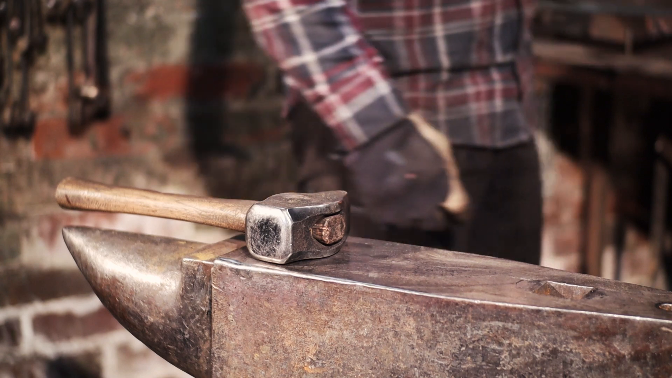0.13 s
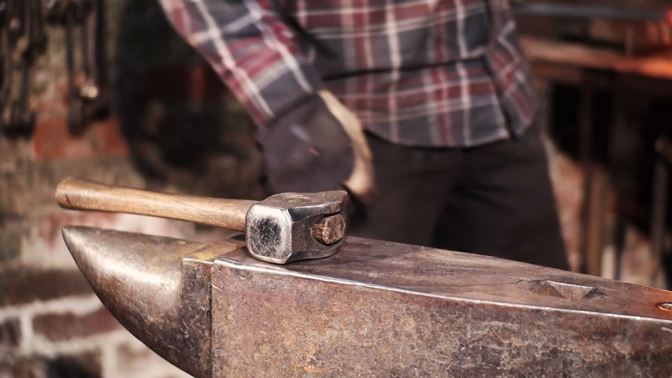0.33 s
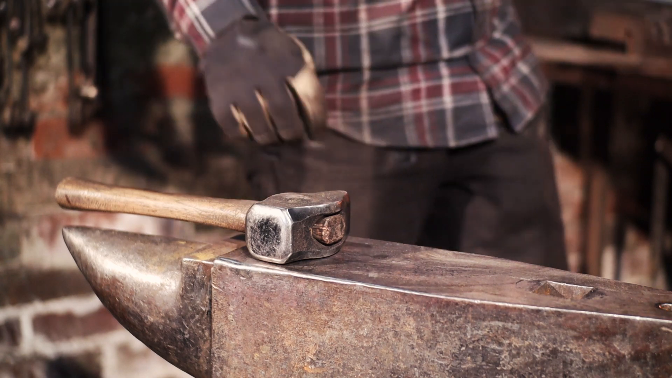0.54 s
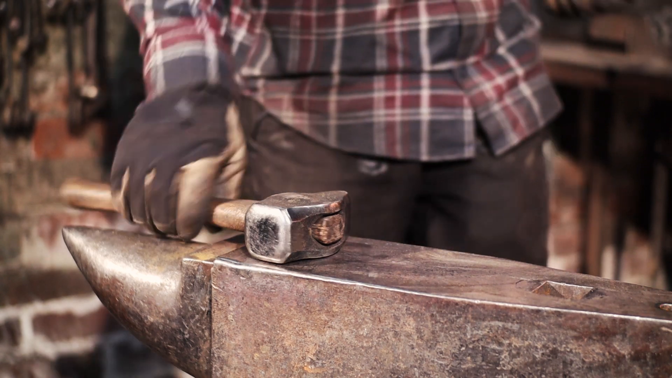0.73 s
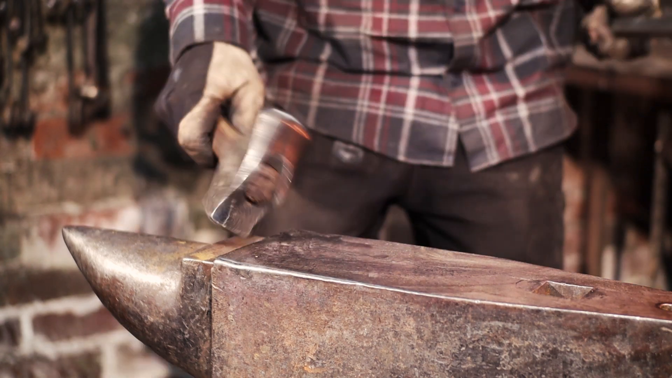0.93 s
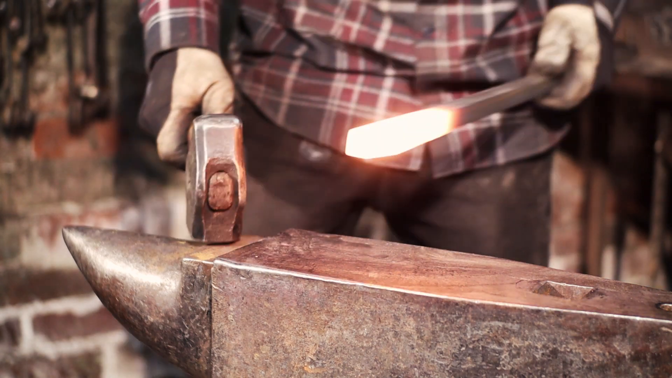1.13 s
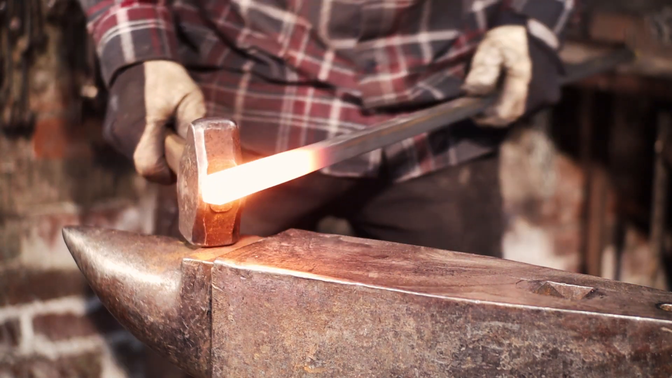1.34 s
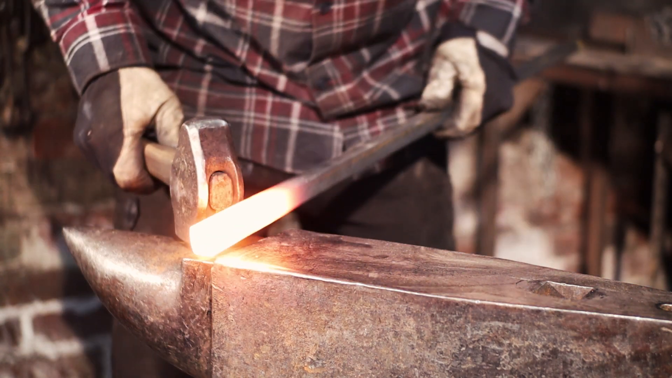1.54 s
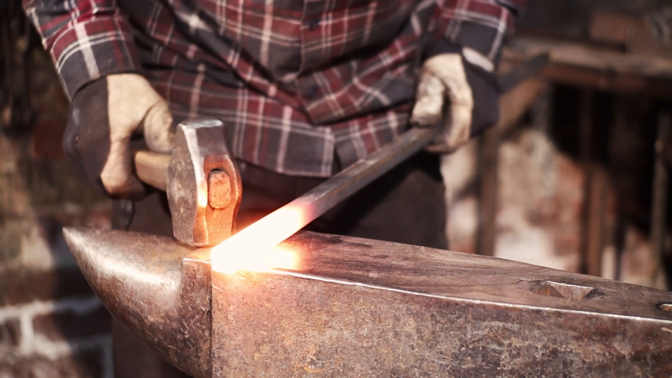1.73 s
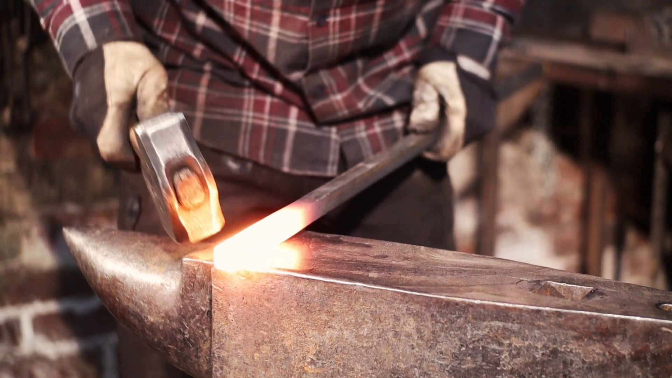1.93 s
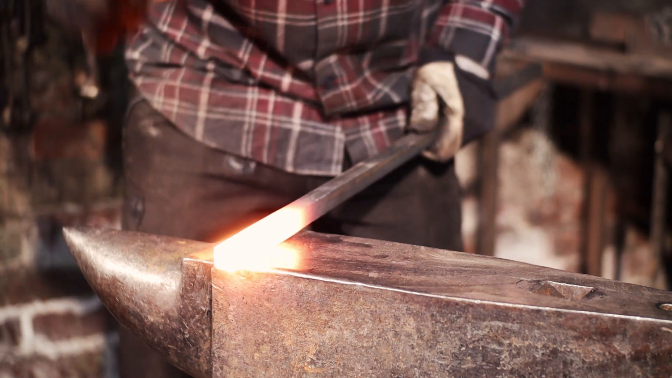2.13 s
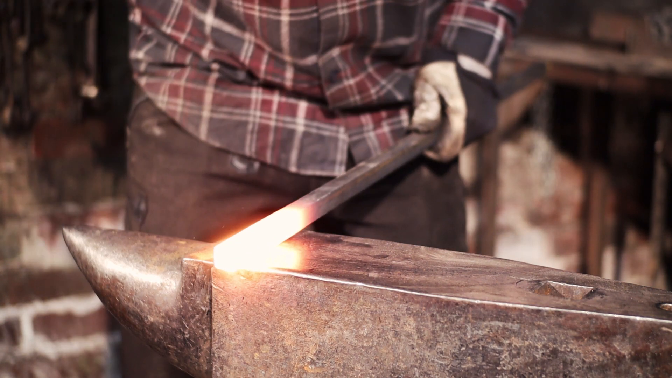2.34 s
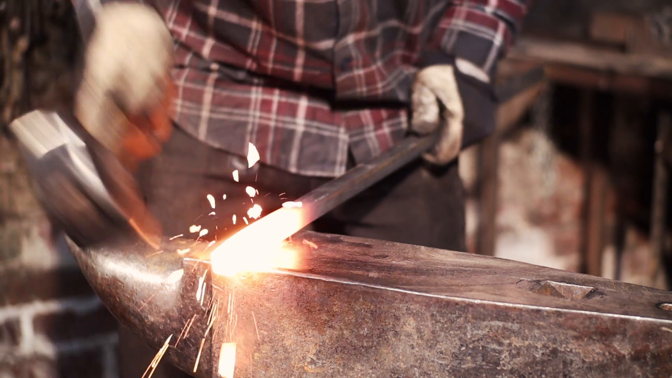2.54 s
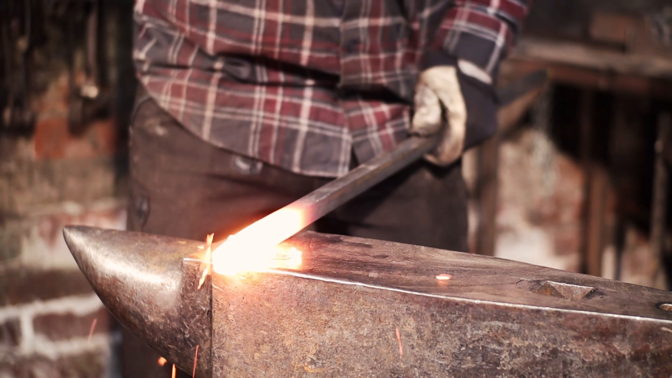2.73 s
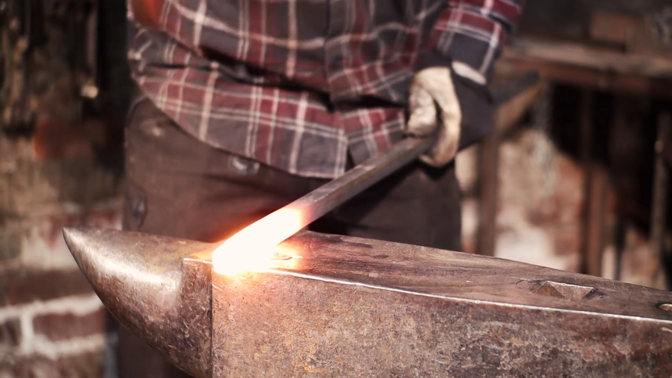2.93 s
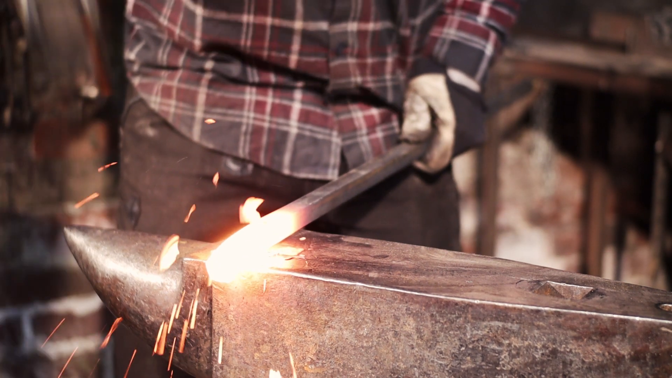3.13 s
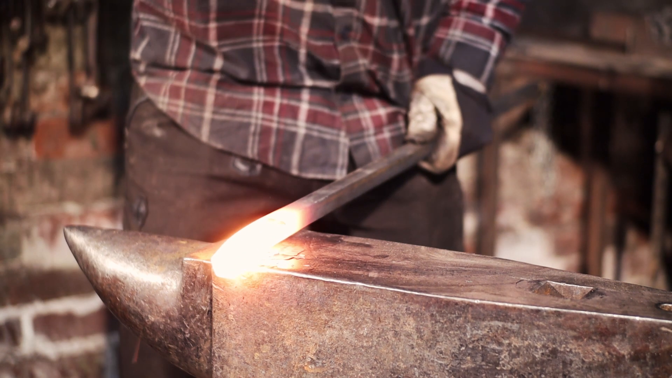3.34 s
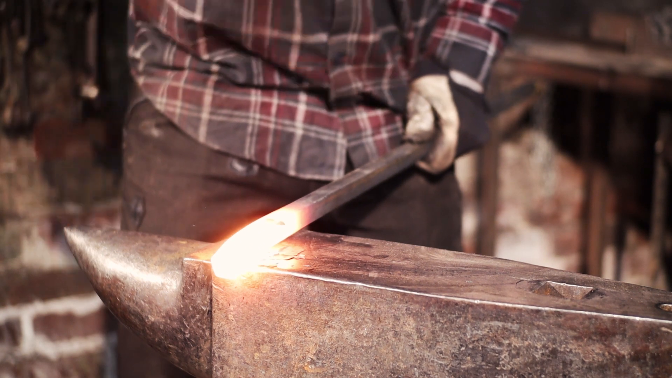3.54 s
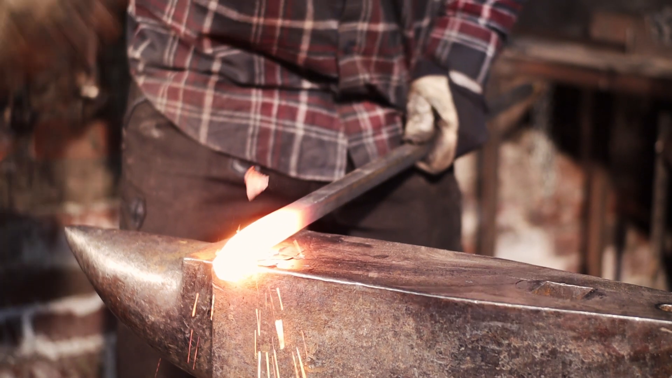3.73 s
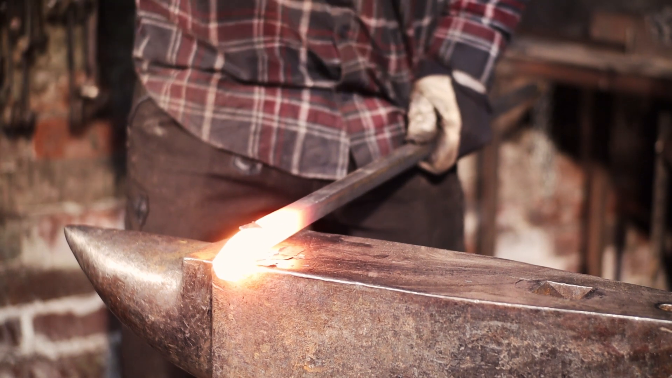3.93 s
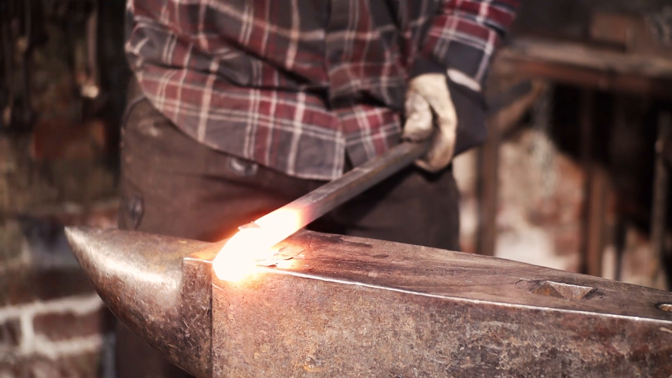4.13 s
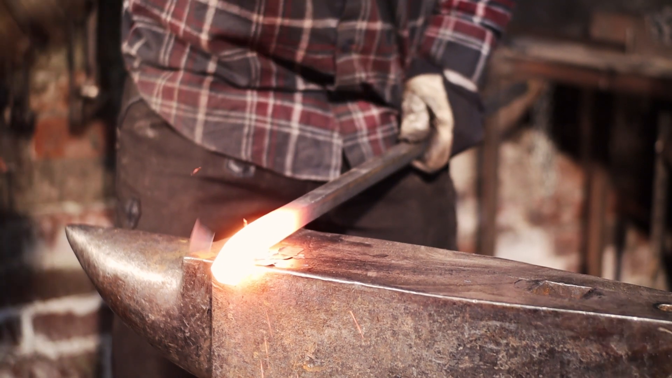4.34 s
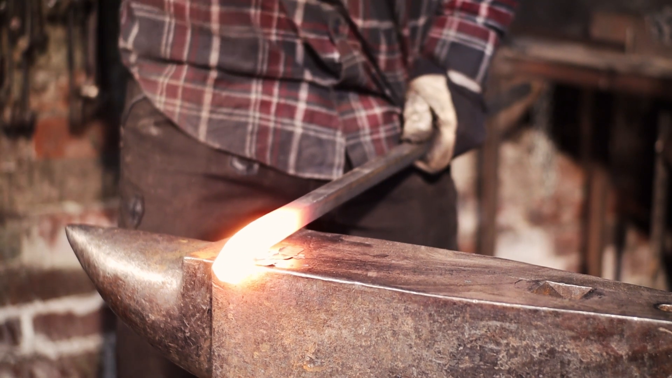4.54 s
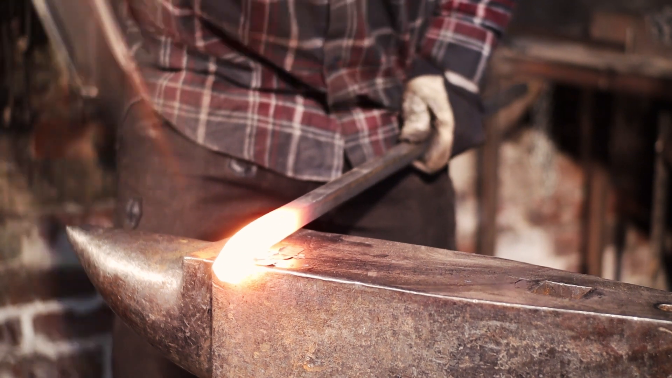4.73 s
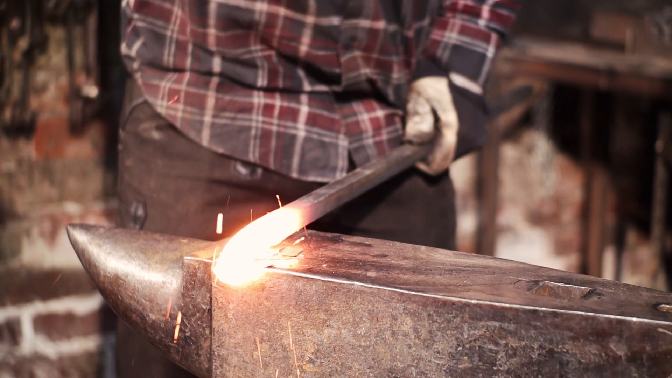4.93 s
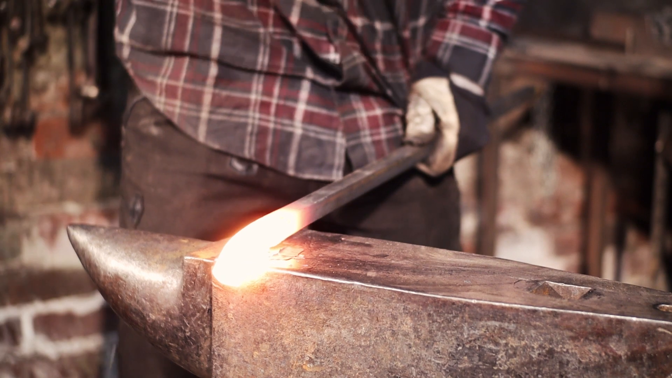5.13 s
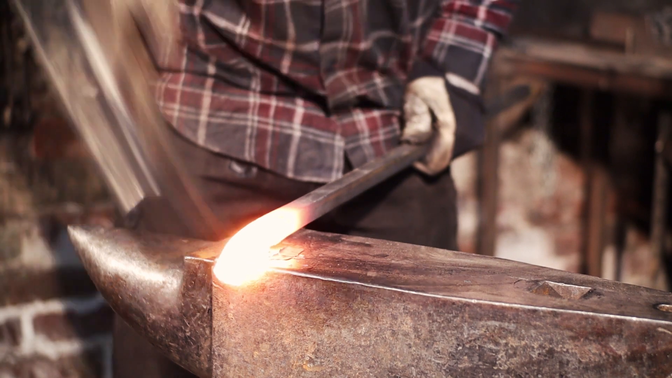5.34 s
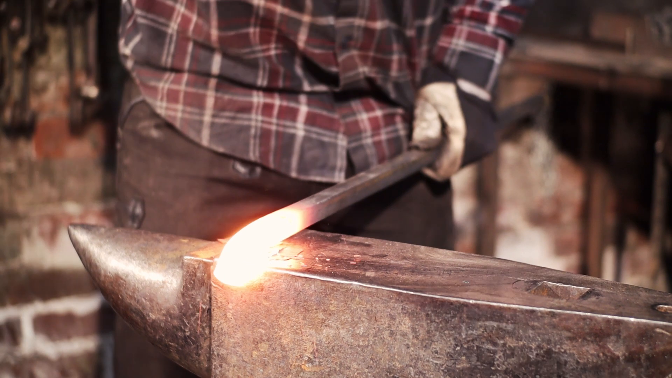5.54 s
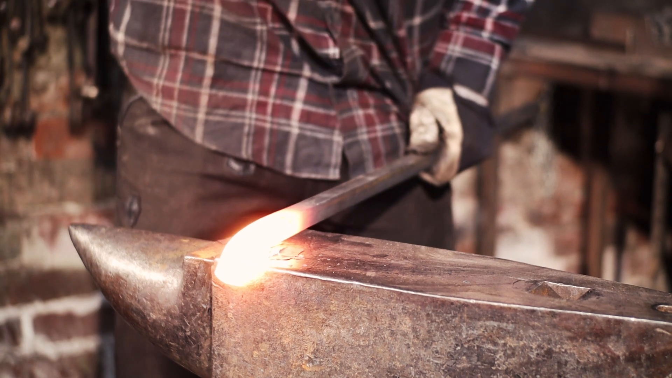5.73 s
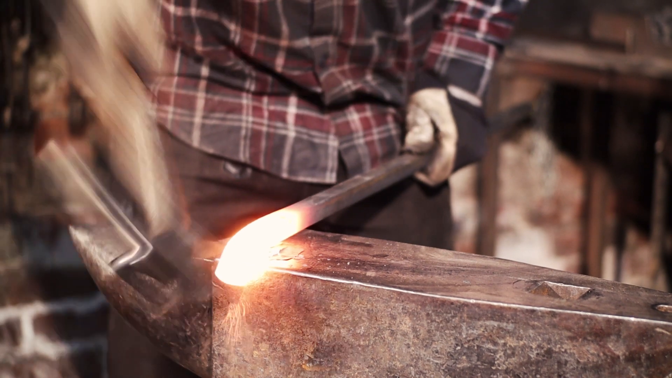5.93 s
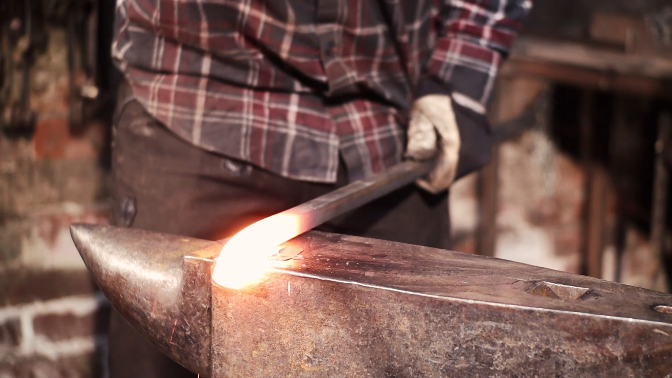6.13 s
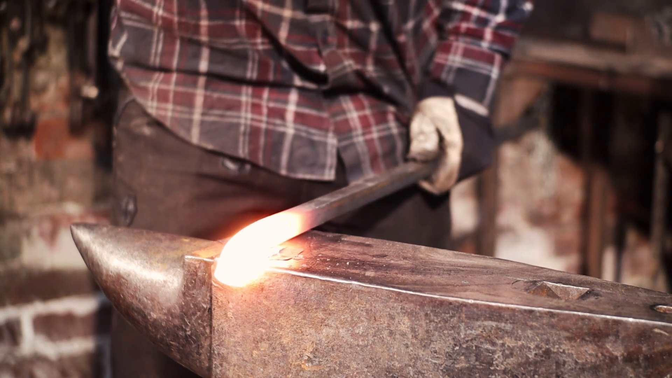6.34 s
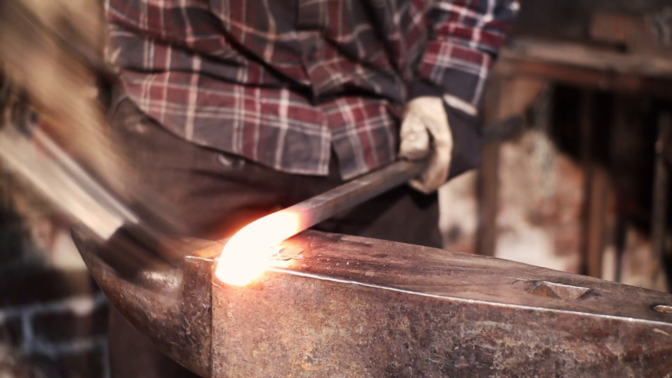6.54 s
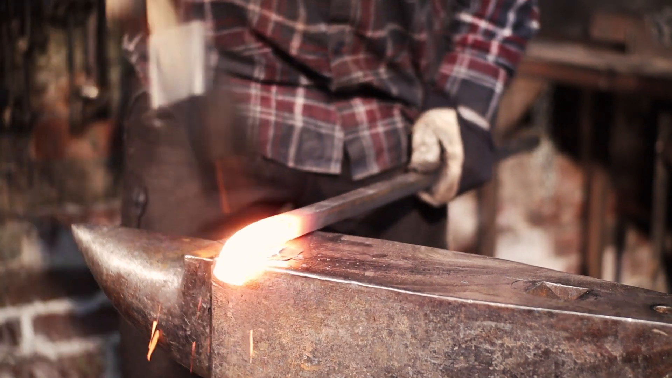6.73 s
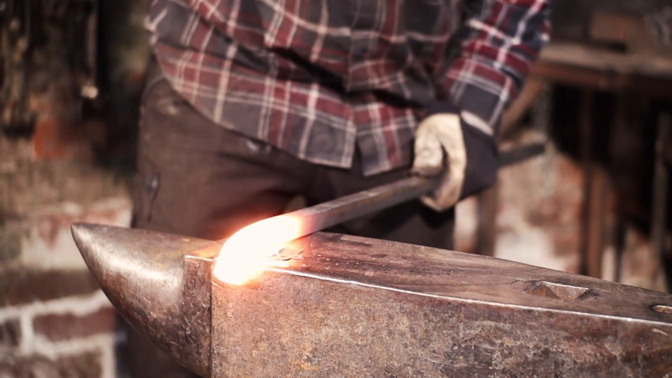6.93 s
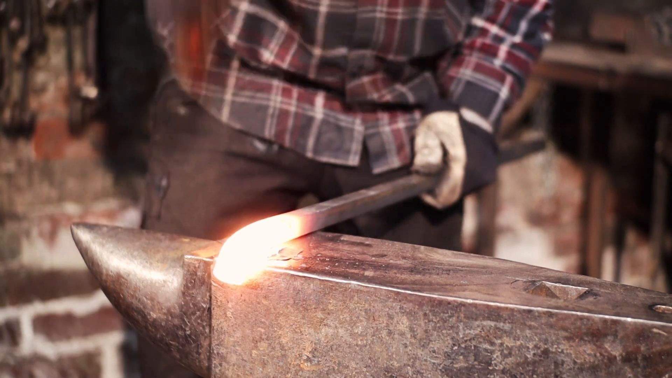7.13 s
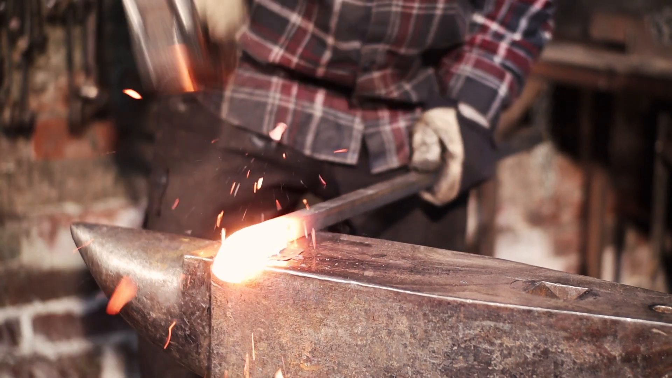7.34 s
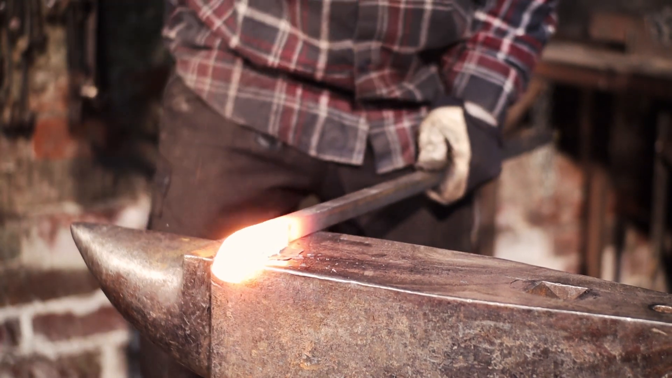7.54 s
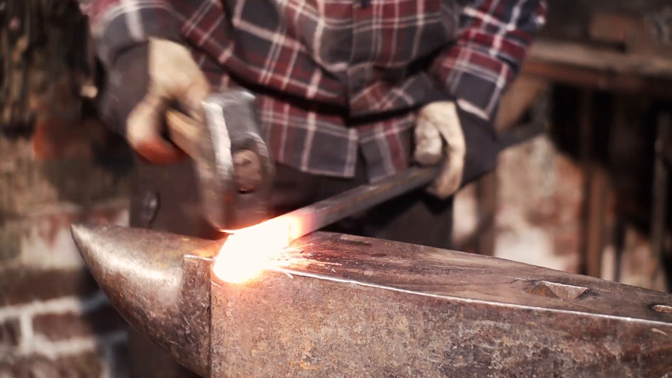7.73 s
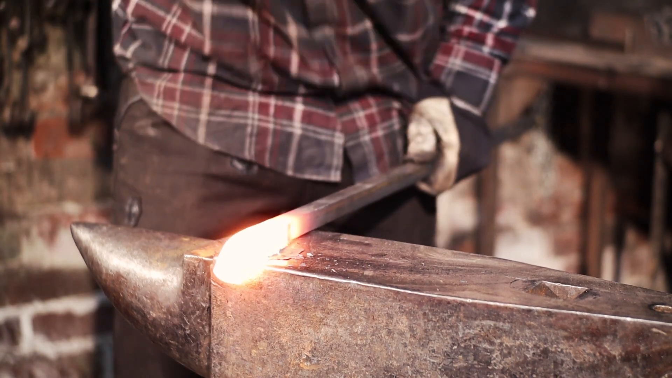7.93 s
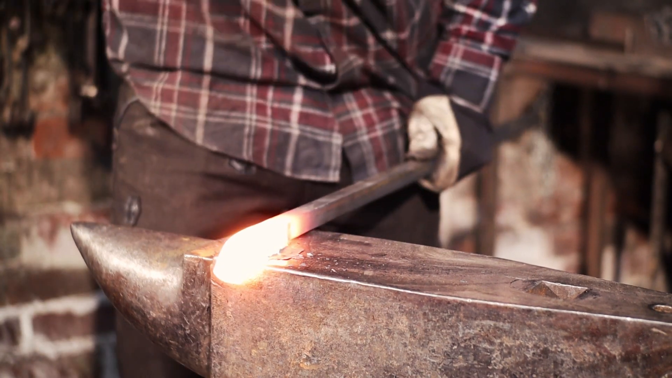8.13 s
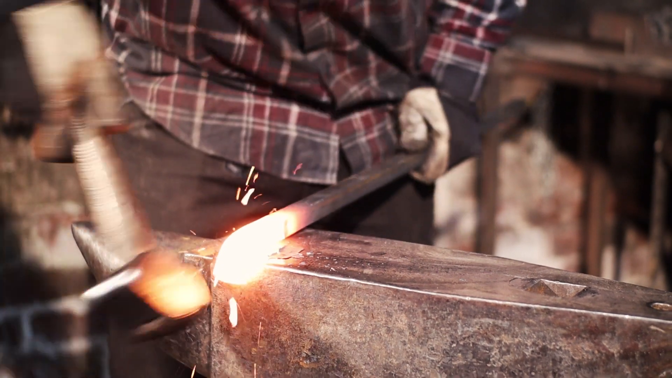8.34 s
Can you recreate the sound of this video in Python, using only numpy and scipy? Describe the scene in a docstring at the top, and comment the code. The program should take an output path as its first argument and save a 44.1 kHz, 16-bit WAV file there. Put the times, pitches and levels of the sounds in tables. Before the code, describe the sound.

In a brick forge, a smith strikes a hot steel bar ten times, each blow a hard cracking clang with a short ring and low boom.

```python
"""A hearth rushes and hums faintly; iron tools clank down nearby, the hammer knocks lightly on the anvil, and a
bar slides into place. A smith in a brick forge then gives the glowing bar ten hammer blows on an anvil. Each
blow is a half-sine-swelled thud plus a noise burst of cracking scale and a dense clang. Decaying sines make the
rocking and ringing anvil; low modes swell into a boom. Noise makes the sliding, falling flakes and popping
sparks; decaying noise makes the room's answer."""
import sys
import numpy as np
from scipy import signal
from scipy.fft import rfft, irfft
from scipy.io import wavfile

SR = 44100
rng = np.random.default_rng(int(sys.argv[2]) if len(sys.argv) > 2 else 0)


def int16_out(signal):
    """Quantize to a 16-bit WAV file."""
    q = np.round(np.clip(np.atleast_2d(signal).T, -1, 1) * 32767)
    wavfile.write(sys.argv[1], SR, q.astype(np.int16))


N = 369558
AGE = np.arange(SR) / SR  # seconds since an event's onset


def from_db(db):
    """Decibels to gain."""
    return 10 ** (np.asarray(db) / 20)


def add(track, start_s, sound):
    """Mix a sound in at a time, cutting it at the track's end."""
    at = int(start_s * SR)
    track[at:at + len(sound)] += sound[:N - at]


def highpass(x, corner_hz, order=2):
    """Butterworth high-pass."""
    sos = signal.butter(order, corner_hz, "high", fs=SR, output="sos")
    return signal.sosfilt(sos, x + 1e-18)  # tiny offset avoids slow denormals


def colour_gain(spectrum, size):
    """FFT-bin gains, interpolated over log frequency, falling 12 dB/octave below the table."""
    hz, db = np.transpose(spectrum)
    bin_hz = np.maximum(np.fft.rfftfreq(size, 1 / SR), 1)
    gain = from_db(np.interp(np.log(bin_hz), np.log(hz), db))
    return gain * np.minimum(bin_hz / hz[0], 1) ** 2


def noise(spectrum, size):
    """Noise of rms 1 with a given colour."""
    white = rng.standard_normal(size)
    x = irfft(rfft(white) * colour_gain(spectrum, size), size)
    return x / x.std()


def arch(length_s):
    """Half-sine swell, zero after its length."""
    return np.sin(np.pi * np.clip(AGE / length_s, 0, 1))


def wander(rate_hz):
    """Random curve: straight lines between knots of spread 1."""
    knots = rng.standard_normal(2000)
    return np.interp(AGE * rate_hz, np.arange(len(knots)), knots)


def ring(modes):
    """Struck modes: decaying sines."""
    return sum(from_db(db - 60 * AGE / t60_s) * np.sin(2 * np.pi * hz * AGE) for hz, db, t60_s in modes)


def wavering_ring(modes, mingle_s=0.09, rate_hz=28):
    """Struck modes whose level and phase waver once reflections mingle with them."""
    depth = 0.4 * (1 - np.exp(-AGE / mingle_s))
    out = 0
    for hz, db, t60_s in modes:
        phase = 2 * np.pi * hz * AGE + depth * wander(rate_hz)
        level = from_db(db - 60 * AGE / t60_s) * (1 + depth * wander(rate_hz))
        out = out + level * np.sin(phase)
    return out


def wash(table):
    """Modes too dense to tell apart: third-octave noise bands, each with its own energy and decay."""
    hz, db, t60_s = np.transpose(table)
    edges_hz = np.geomspace(45, 18000, 27)
    age = AGE[:int(1.5 * t60_s.max() * SR)]
    white = rng.standard_normal((2, len(AGE)))[:, :len(age)]
    out = np.zeros(len(AGE))
    for k, (low, high) in enumerate(zip(edges_hz, edges_hz[1:])):
        centre = np.sqrt(low * high)
        level_db = np.interp(np.log(centre), np.log(hz), db)
        decay_s = np.interp(np.log(centre), np.log(hz), t60_s)
        skirt = min(centre / hz[0], hz[-1] / centre, 1) ** 2
        sos = signal.butter(2, [low, high], "band", fs=SR, output="sos")
        # neighbouring bands take different noise
        band = signal.sosfilt(sos, white[k % 2] * from_db(-60 * age / decay_s))
        # at 0 dB a band holds the energy a unit impulse has there
        unit_energy = np.sqrt(2 * (high - low) / SR / np.sum(band ** 2))
        out[:len(age)] += band * from_db(level_db) * skirt * unit_energy
    return out


# air rush colour: (frequency [Hz], relative level [dB])
AIR = [(50, -9.5), (62, -15.5), (100, -3.5), (130, -19), (230, -4), (350, -15.5), (750, -15), (950, -19),
       (1450, -18), (2100, -31), (3300, -29.5), (4200, -35), (5300, -33), (7500, -47), (11000, -54),
       (16000, -54.5)]
AIR_RMS_DB = -48.5
# blower hum: (frequency [Hz], rms level [dB])
HUM = [(102, -63), (301.5, -61.5), (791, -65.5)]


def hearth():
    """Steady turbulent rush of hearth and blower: coloured noise plus the blower's sine hum."""
    t = np.arange(N) / SR
    hum = sum(np.sqrt(2) * from_db(db) * np.sin(2 * np.pi * hz * t) for hz, db in HUM)
    return from_db(AIR_RMS_DB) * noise(AIR, N) + hum


# knocks: tools set down (to 0.19 s), then the hammer touching the anvil: (time [s], click gain [dB], ring gain
# [dB])
KNOCKS = [(0.1752, -3.5, -40), (0.1787, -5, 3), (0.1814, 1, -30), (0.1879, -6.5, -21), (0.9, -25, -35),
          (0.9688, -25, -37), (0.987, -26.5, -42), (1.2203, -16.5, -25.5), (1.288, -15.5, -23.5),
          (1.3227, -19.5, -28), (1.346, -28, -39)]
# hollow body of a knock: (frequency [Hz], level [dB], t60 [s])
KNOCK_BODY = [(100, 16, 0.37), (149, 21.5, 0.27), (288, 23.5, 0.25), (416, 26, 0.13), (560, 21.5, 0.068),
              (785, 21, 0.024), (1330, 18.5, 0.16), (2210, 5, 0.12)]
# dense modes of a click: (frequency [Hz], level [dB], t60 [s])
KNOCK_CLICK = [(800, -11, 0.084), (1600, 6.5, 0.032), (2730, 15, 0.06), (3600, 11, 0.012),
               (4640, 14, 0.087), (6450, -16, 0.25), (8800, -10, 0.086), (10900, -33, .04),
               (15000, -32, .04)]
# ringing modes of the knocked iron: (frequency [Hz], level [dB], t60 [s])
KNOCK_RING = [(2807, -19, .11), (2807, -35, .65), (2898, -20, .11), (2898, -32.5, .52), (1556, -36, .35),
              (2562, -43, .8), (3655, -41, .5), (4194, -47, .55), (4576, -36, .25), (5373, -39, .3),
              (8861, -52, .35)]
# hammer edge tinking as it leaves the anvil: (frequency [Hz], level [dB], t60 [s])
TINK = [(12270, -65, 0.48)]
TINK_S = 0.97
# body against click at a 0 dB click; dB gained per dB softer
HOLLOW_DB, HOLLOW_GAIN = -2, 0.23
# body's low corner at a 0 dB click; dB softer per octave down
HOLLOW_HZ, HOLLOW_DB_PER_OCTAVE = 300, 9


def knocks():
    """Iron knocks of tools and hammer: click, hollow body, ring; gentler touches are duller, deeper and last
    longer."""
    touches, rings = np.zeros(N), np.zeros(N)
    for s, click_db, ring_db in KNOCKS:
        body_db = HOLLOW_DB - HOLLOW_GAIN * click_db
        lowest_hz = HOLLOW_HZ * 2 ** (click_db / HOLLOW_DB_PER_OCTAVE)
        body = highpass(wash(KNOCK_BODY), lowest_hz)
        knock = wash(KNOCK_CLICK) + from_db(body_db) * body
        add(touches, s, from_db(click_db) * knock)
        add(rings, s, from_db(ring_db) * wavering_ring(KNOCK_RING))
    add(rings, TINK_S, wavering_ring(TINK))
    return touches, rings


# glove, bar and sleeve sliding: (start [s], end [s], level before grit and swell [dB])
SLIDES = [(0.731, .88, -57.5), (1.548, 1.70, -45.5), (6.628, 6.70, -49), (7.76, 7.80, -53.5)]
# slide and flake colour: (frequency [Hz], relative level [dB])
SLIDE = [(300, 4), (900, 4.5), (2000, -3), (5000, -1.5), (8000, -15), (15000, -20.5)]
# larger scale flakes landing: (time [s], onset level [dB])
FLAKES = [(3.515, -47), (4.661, -47.5), (5.364, -45), (5.405, -47), (6.515, -45.5)]


def handling(grit_db=1.5, grit_hz=440, flake_t60_s=0.01545):
    """Friction as noise of randomly varying level; falling scale as short decaying noise ticks."""
    out = np.zeros(N)
    for start_s, end_s, db in SLIDES:
        grit = from_db(grit_db * wander(grit_hz))
        swell = np.sqrt(arch(max(end_s - start_s, 0.01)))
        add(out, start_s, from_db(db) * noise(SLIDE, len(AGE)) * grit * swell)
    for s, db in FLAKES:
        add(out, s, from_db(db - 60 * AGE / flake_t60_s) * noise(SLIDE, len(AGE)))
    return out


# hammer blows, shared by all blow layers: (time [s], thud [dB], crack [dB], clang [dB],
# treble tilt [dB per octave over the top two], body ring [dB], face ring [dB])
BLOWS = [ (2.5962, -12.5, -15.5, 6.5, 2, -16, -0.5), (3.1287, -16.5, -15.5, 4.5, 1.5, -17, -6),
         (3.7296, -3.5, -5.5, 3, -1, -23, -8), (4.3222, -4, -8, 2.5, 1, -18, -10),
         (4.8946, -3, -6, 2.5, -1.5, -6.5, -10), (5.4796, -1, -1, 1.5, 1, -21.5, -15),
         (6.0732, 1, -10, 1.5, 3.5, -2, -4.5), (6.6922, -0.5, -9.5, 5.5, -17, -10, -9),
         (7.3286, -14.5, -3.5, 7.5, 3, -26, 6), (7.8384, -4.5, -5, 10, -7, -17, 1)]
# anvil rocking on its stand: (frequency [Hz], level [dB], t60 [s])
ROCKING = [(192.6, -23.5, 0.25), (278.6, -17, 0.15), (394, -13, 0.048), (474.5, -13.5, 0.038),
           (686.5, -13.5, 0.071)]
# shattering scale cushions the blow: rocking at a 0 dB crack; dB lost per dB of crack
ROCK_DB, ROCK_LOSS = -5, 0.4
# the worked bar hardens: first and final thud pitch, time constant
SOFT_HZ, HARD_HZ, HARDEN_S = 380, 672, 1.31


def thuds(best_ratio=0.7, falloff_db=18.0, lowest_hz=170):
    """The head stops in the soft bar and the anvil rocks; pitch rises with time as the bar hardens."""
    out = np.zeros(N)
    hz, db, t60_s = np.transpose(ROCKING)
    for s, thud_db, crack_db, *_ in BLOWS:
        rock_db = ROCK_DB - ROCK_LOSS * crack_db
        softness = np.exp((BLOWS[0][0] - s) / HARDEN_S)
        thud_hz = HARD_HZ - (HARD_HZ - SOFT_HZ) * softness
        # stopping and rebounding pushes the air to and fro twice
        push = -np.sin(2 * np.pi * thud_hz * AGE) * arch(2 / thud_hz) ** 2
        add(out, s, from_db(thud_db) * push)
        # a slower contact favours the lower modes
        octaves_off = np.log2(hz / (best_ratio * thud_hz))
        mode_db = rock_db + db - falloff_db * octaves_off ** 2
        add(out, s + 1 / (2 * thud_hz), ring(zip(hz, mode_db, t60_s)))
    # an anvil is too small to radiate deep bass
    return highpass(out, lowest_hz)


def burst(spectrum, length_s, count=4, size=1024):
    """Crack of many tiny snaps: noise alternately fitted to a colour and a swell."""
    colour = colour_gain(spectrum, size)
    swell = arch(length_s)[:size]
    x = rng.standard_normal(size) * swell
    for _ in range(count):
        phase = np.angle(rfft(x))
        x = irfft(colour * np.exp(1j * phase), size) * np.sqrt(swell)
    return x * np.sqrt(np.sum(swell ** 2) / np.sum(x ** 2))


def tilted(x, tilt_db, corner_hz=5500):
    """Harder contacts lift the treble, negative tilts lower it: a shelf of twice the tilt."""
    top = highpass(x, corner_hz, order=1)
    return x + (from_db(2 * tilt_db) - 1) * top


# dense clang modes of bar and hammer head: (frequency [Hz], level [dB], t60 [s])
CLANG = [(400, -8, 0.089), (800, 10.5, 0.12), (1304, 10, 0.053), (2010, 6.5, 0.11), (2800, 8, 0.11),
         (3900, 6.5, 0.03), (4560, 4, 0.13), (5170, 7.5, 0.14), (6800, -7.5, 0.1), (10410, -7, 0.053),
         (15500, -21.5, .07)]
# cracking scale colour: (frequency [Hz], relative level [dB])
CRACK = [(250, -2), (700, 3), (1200, 9.5), (1900, -7), (3200, -2), (4000, -1), (5200, 5), (6800, -14.5),
         (11000, -20), (16000, -32.5)]


def cracks(crack_s=0.0032):
    """Scale shatters during the contact; bar and hammer head clang for a moment."""
    out = np.zeros(N)
    for s, _, crack_db, clang_db, tilt_db, _, _ in BLOWS:
        strike = from_db(clang_db) * wash(CLANG)
        add(strike, 0, from_db(crack_db) * burst(CRACK, crack_s))
        add(out, s, tilted(strike, tilt_db))
    return out


# anvil steel: (frequency [Hz], level [dB], t60 [s], share [0 = body bending .. 1 = face ringing])
ANVIL = [(1503, -33, 0.45, 0.77), (1653, -42, 0.95, 0.7), (2169, -37.5, .6, .9), (2415, -27.5, .35, 0),
         (2415, -36, .95, 0), (5208, -23, .21, 1), (2988, -44, 0.91, 0.6), (3610, -39.5, 0.3, 1),
         (4426, -37, 0.55, 0.88), (4824, -36.5, 0.384, .6), (5900, -39.5, 0.3, 0.57),
         (13520, -57, .18, 0.82), (14340, -46.5, .17, .8), (15410, -49.5, .17, 0.8)]


def anvil(spread_db=-0.4):
    """Where the blow lands decides how much the steel's body and face modes ring."""
    out = np.zeros(N)
    hz, db, t60_s, face = np.transpose(ANVIL)
    face = np.clip(face, 0, 1)
    for s, *_, body_db, face_db in BLOWS:
        place_db = (1 - face) * body_db + face * face_db
        mode_db = db + place_db + spread_db * rng.standard_normal(len(hz))
        add(out, s, wavering_ring(zip(hz, mode_db, t60_s)))
    return out


# room standing waves fed through the floor: (frequency [Hz], level [dB], t60 [s])
BOOM = [(64.3, -26.5, 0.7), (67.47, -22.5, 0.94), (83.7, -26.5, 1.02), (101.3, -44.5, 1.7),
        (169.1, -37, 1.32), (185.2, -31.5, 0.79), (259, -34.5, 0.97)]
# dense low modes: (frequency [Hz], level [dB], t60 [s])
RUMBLE = [(130, 6.5, 0.55), (192.6, 25.5, 0.546), (316, 27.5, 0.98), (490, 12, 0.7), (892, -14.5, .6)]
# what the thud does not soak up reaches the floor: boom at a 0 dB thud; dB lost per dB of thud
BOOM_DB, BOOM_LOSS = -2, 0.23


def boom(build_s=0.069, rumble_build_s=0.005, glide_hz=480, glide_s=0.0217, glide_db=-19, glide_t60_s=0.19):
    """Each blow goes through the stand into the floor; the room's low modes swell after it."""
    out = np.zeros(N)
    # floor bending waves: high ones arrive first, so the pitch sinks
    phase = 2 * np.pi * glide_hz * glide_s * np.log1p(AGE / glide_s)
    onset = 1 - np.exp(-AGE * glide_hz / 2)
    glide = from_db(glide_db - 60 * AGE / glide_t60_s) * np.sin(phase) * onset
    room_modes = ring(BOOM) * (1 - np.exp(-(AGE / build_s) ** 2))
    rumble = wash(RUMBLE) * (1 - np.exp(-AGE / rumble_build_s))
    swell = room_modes + rumble
    for s, thud_db, *_ in BLOWS:
        add(out, s, from_db(BOOM_DB - BOOM_LOSS * thud_db) * (glide + swell))
    return out


SPARK_FIRST_S, SPARK_LAST_S = 0.15, 0.45  # after the blow
SPARK_DB, SPARK_T60_S, SPARK_LOW_HZ = -65, 0.008, 8000  # median onset level before the high-pass


def sparks(spread_db=6.0, count=4):
    """Sparks pop in flight: tiny decaying bright noises at random times after each blow."""
    out = np.zeros(N)
    for s, *_ in BLOWS:
        for flight, size in zip(rng.random(count), rng.standard_normal(count)):
            level_db = SPARK_DB + spread_db * size - 60 * AGE / SPARK_T60_S
            pop = from_db(level_db) * rng.standard_normal(len(AGE))
            pop_s = s + SPARK_FIRST_S + flight * (SPARK_LAST_S - SPARK_FIRST_S)
            add(out, pop_s, pop)
    return highpass(out, SPARK_LOW_HZ)


# diffuse room tail: (frequency [Hz], level [dB], t60 [s])
FORGE = [(99.3, 7.5, 2.5), (244, -3, 1.1), (450, -6, 1.06), (723, -2, 0.9), (1200, -9.5, 0.88),
         (2226, -5.5, 0.84), (4200, -12.5, 0.62), (8020, -8.5, 0.41), (11080, -12, 0.16),
         (16000, -15.5, 0.41)]


def forge(x, near_s=0.0074, far_s=0.034, early=0.46):
    """Near things reflect first, then the brick walls; the treble mostly dies sooner than the bass."""
    build = np.interp(AGE, [0, near_s, far_s - near_s, far_s], [0, early, early, 1])
    return signal.fftconvolve(x, wash(FORGE) * build)[:N]


def scene():
    """Blows, tools and handling in the room; boom, hearth and sparks are added directly."""
    touches, knock_rings = knocks()
    thud, crack, small = thuds(), cracks(), handling()
    rings = anvil() + knock_rings
    # room sends
    struck = from_db(-3.0) * thud + from_db(1.67) * crack
    loose = from_db(4.5) * touches + small
    room = forge(struck + loose + from_db(-19) * rings)
    direct = thud + crack + touches + small + rings
    return (direct + room + boom() + hearth() + sparks())[None]


def record(dry, ceiling=0.62, stopband_hz=17000):
    """Peaks overload the input and are clipped; a steep low-pass cuts the top."""
    sos = signal.cheby2(14, 60, stopband_hz, fs=SR, output="sos")
    return signal.sosfilt(sos, np.clip(dry, -ceiling, ceiling))


dry = scene()
out = record(dry)
int16_out(out)
```